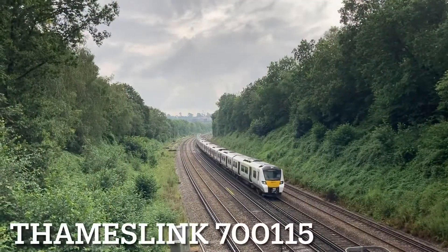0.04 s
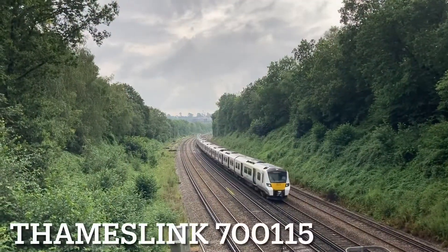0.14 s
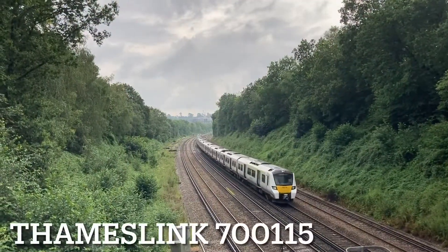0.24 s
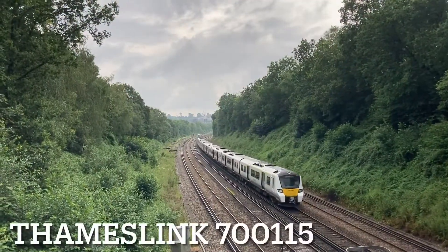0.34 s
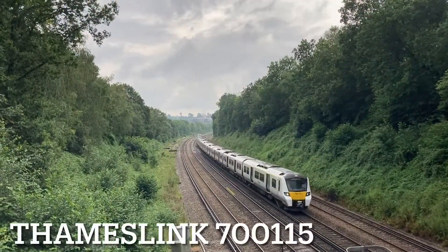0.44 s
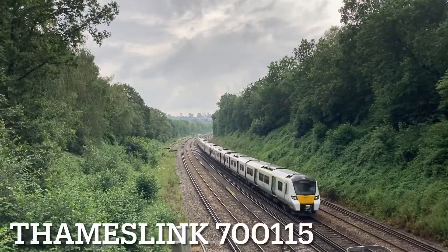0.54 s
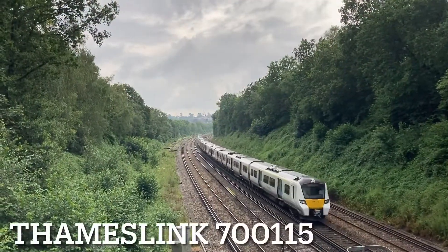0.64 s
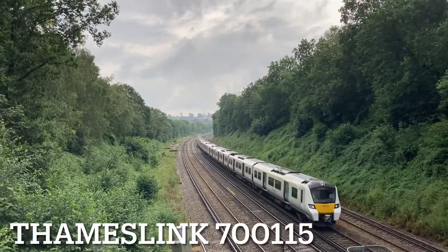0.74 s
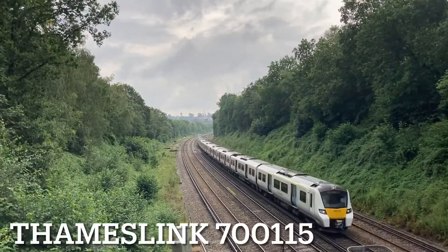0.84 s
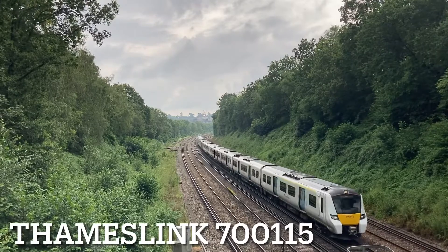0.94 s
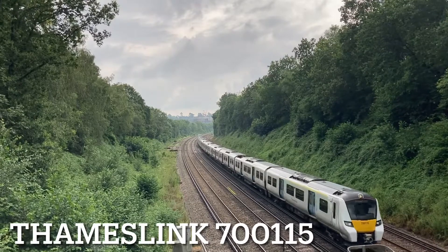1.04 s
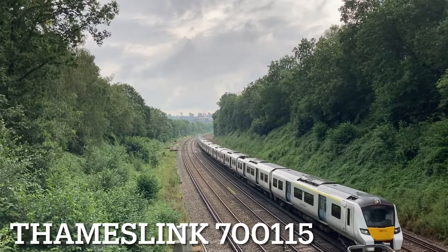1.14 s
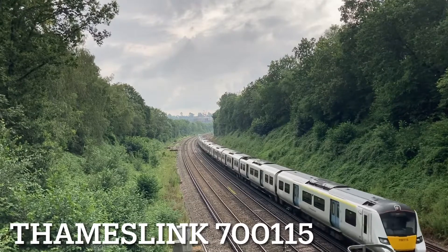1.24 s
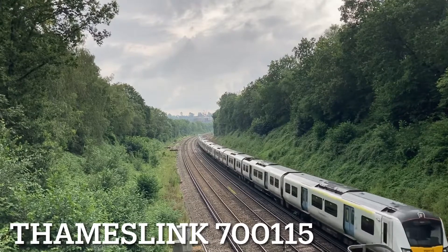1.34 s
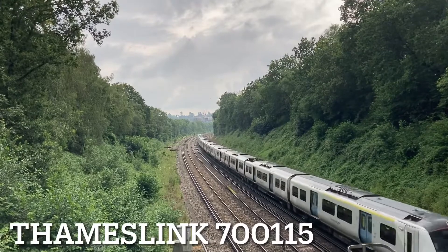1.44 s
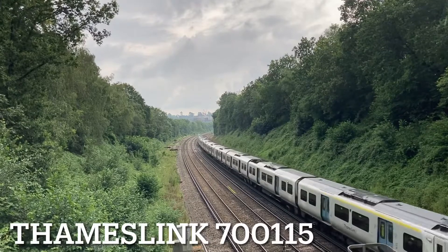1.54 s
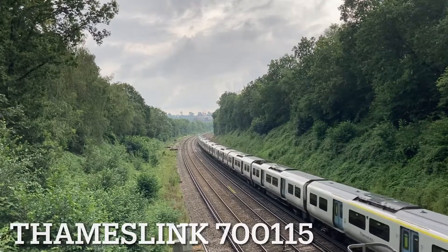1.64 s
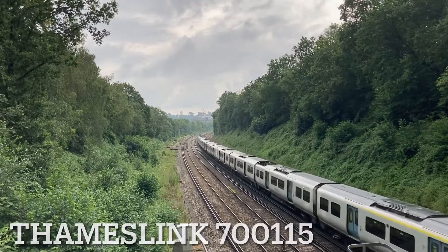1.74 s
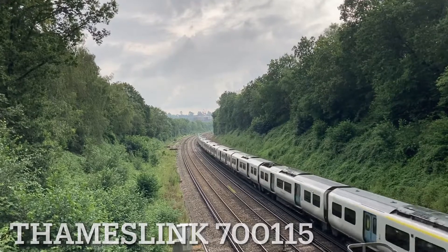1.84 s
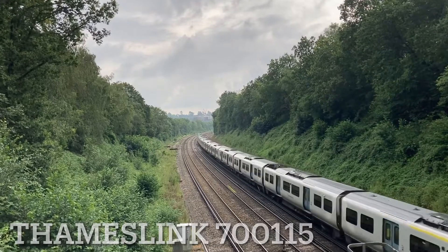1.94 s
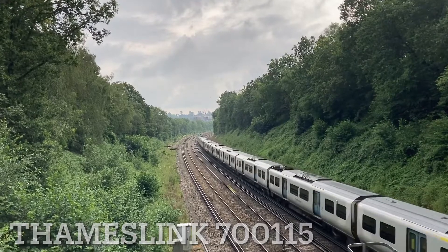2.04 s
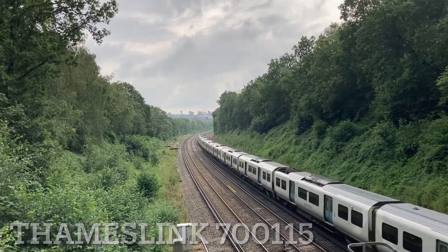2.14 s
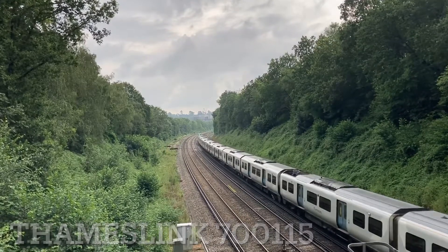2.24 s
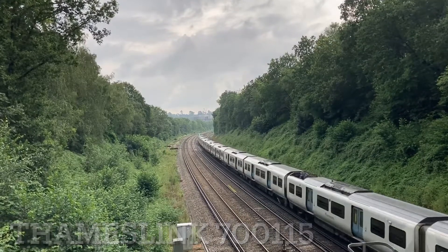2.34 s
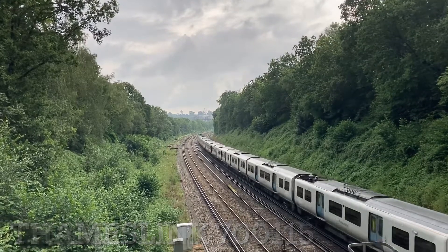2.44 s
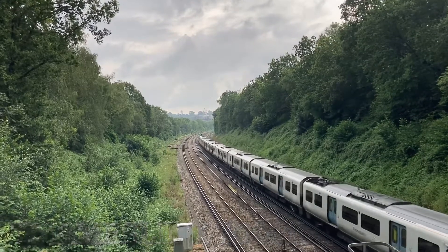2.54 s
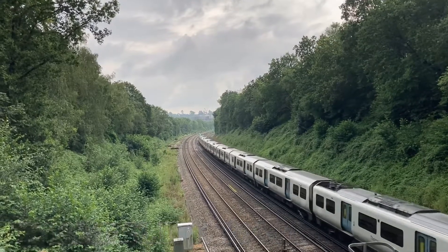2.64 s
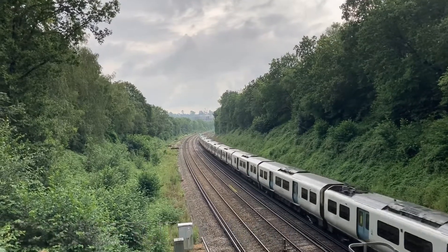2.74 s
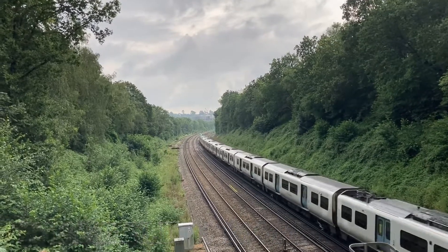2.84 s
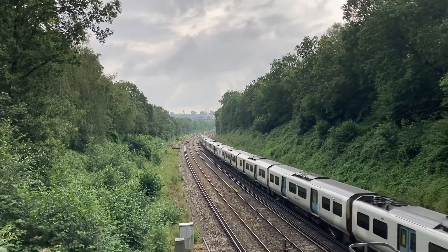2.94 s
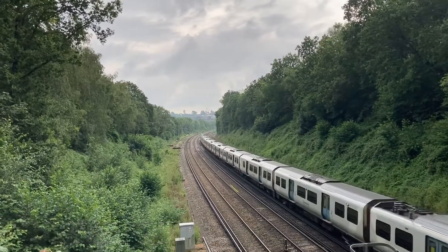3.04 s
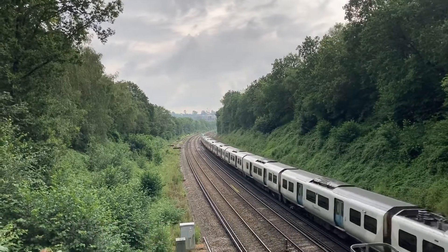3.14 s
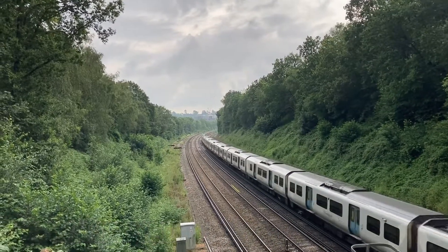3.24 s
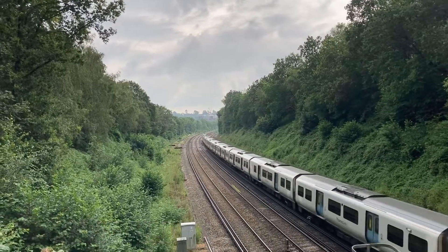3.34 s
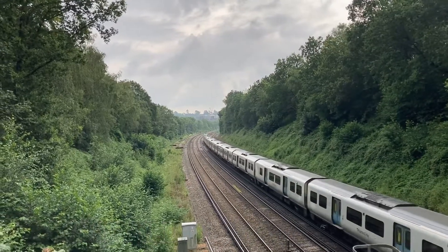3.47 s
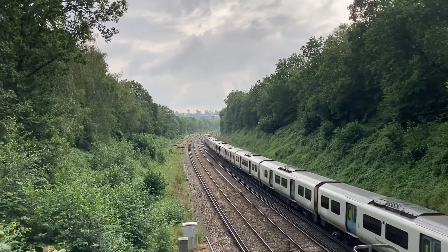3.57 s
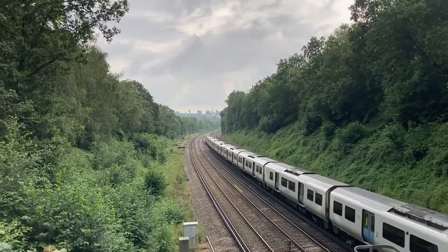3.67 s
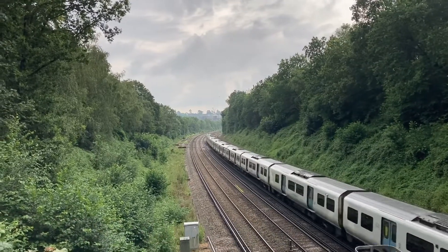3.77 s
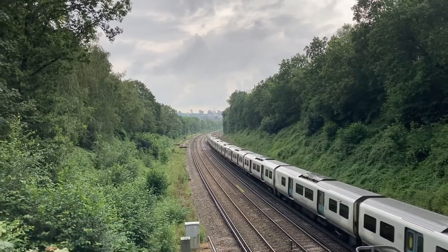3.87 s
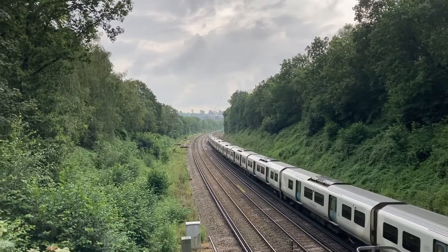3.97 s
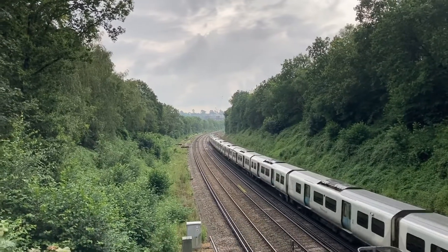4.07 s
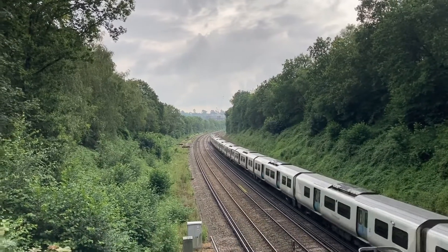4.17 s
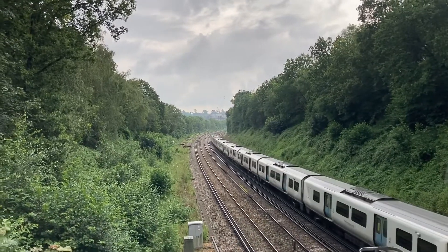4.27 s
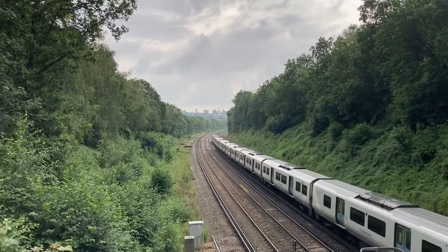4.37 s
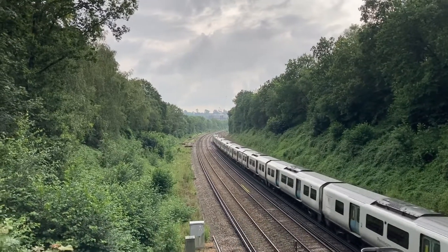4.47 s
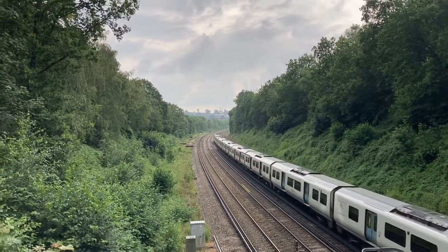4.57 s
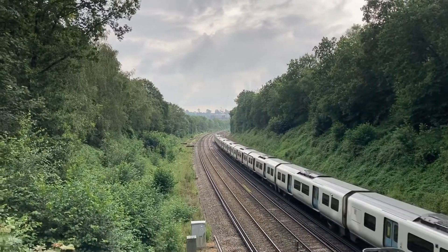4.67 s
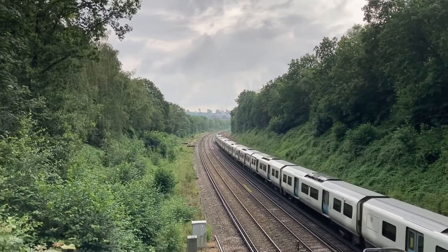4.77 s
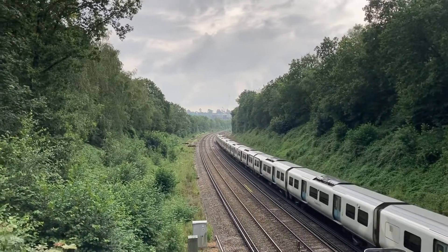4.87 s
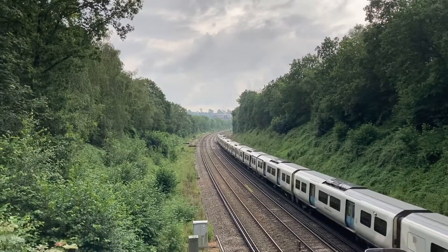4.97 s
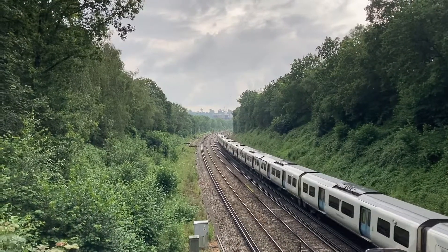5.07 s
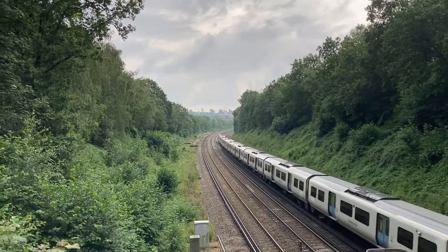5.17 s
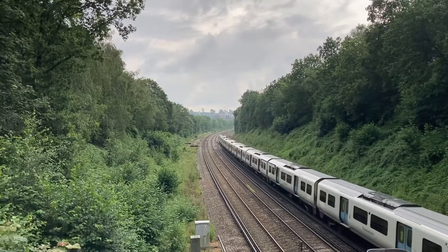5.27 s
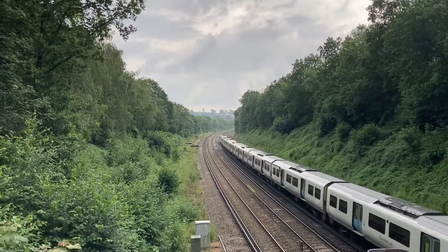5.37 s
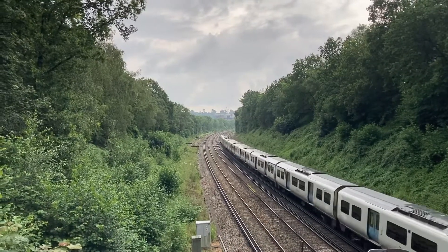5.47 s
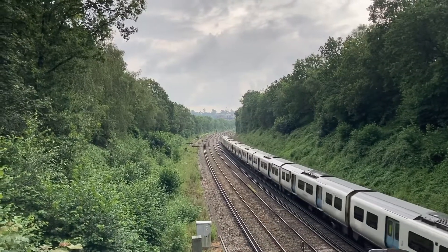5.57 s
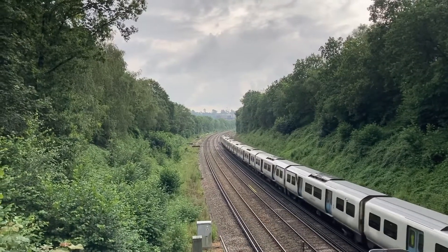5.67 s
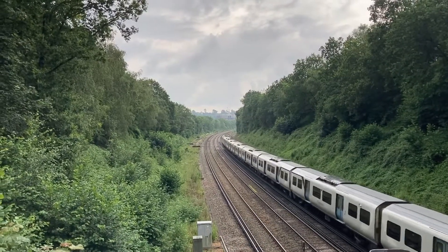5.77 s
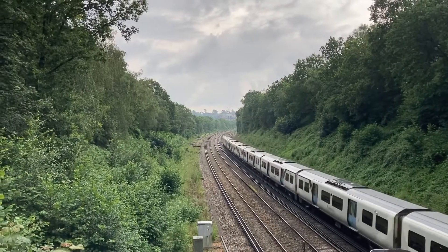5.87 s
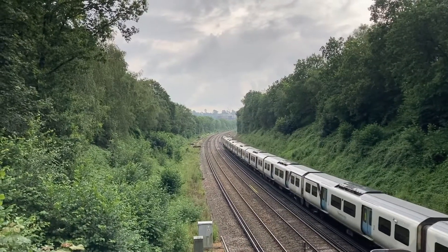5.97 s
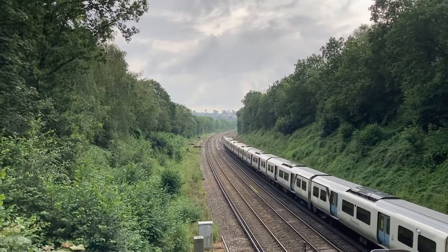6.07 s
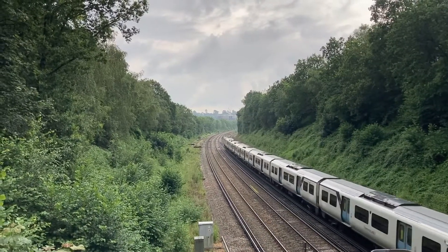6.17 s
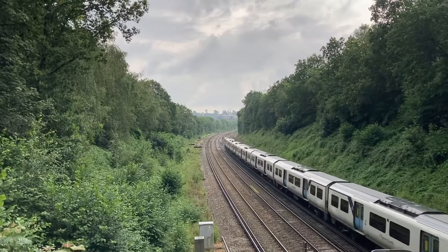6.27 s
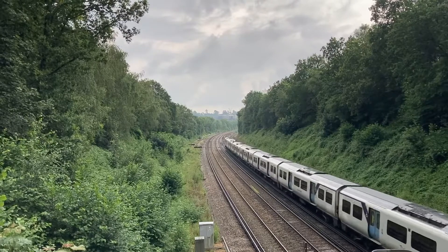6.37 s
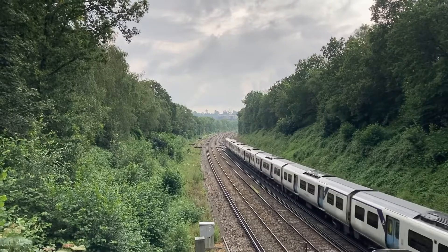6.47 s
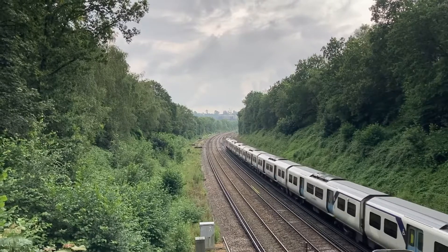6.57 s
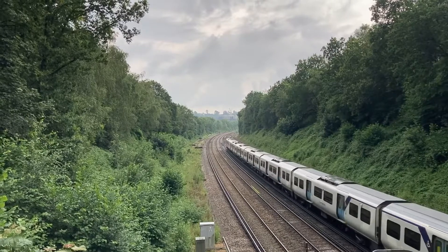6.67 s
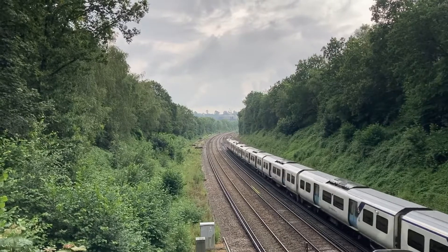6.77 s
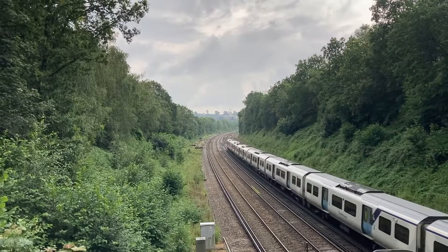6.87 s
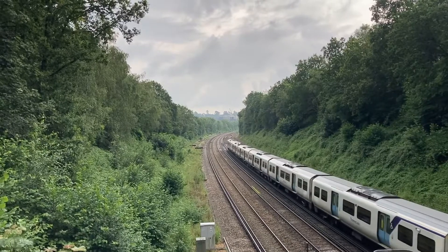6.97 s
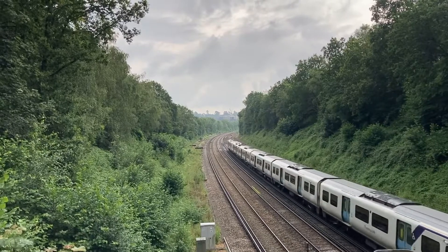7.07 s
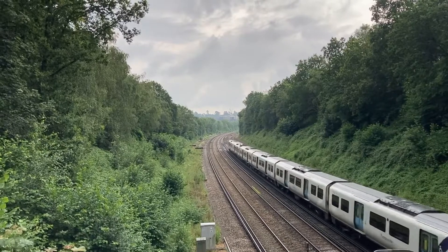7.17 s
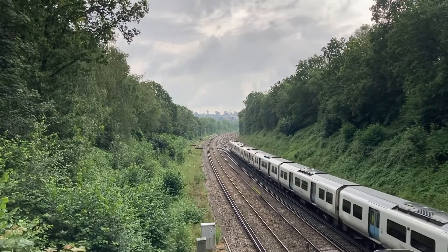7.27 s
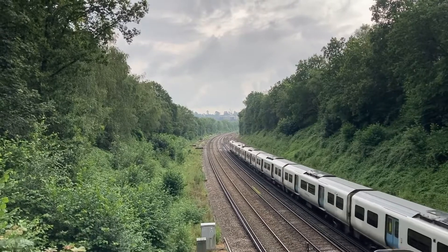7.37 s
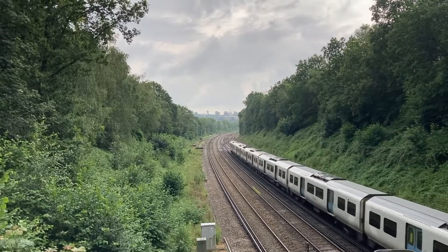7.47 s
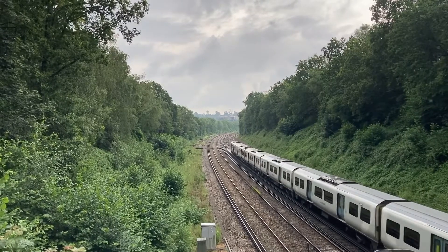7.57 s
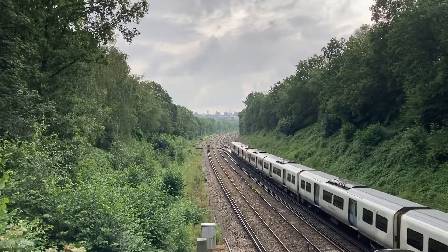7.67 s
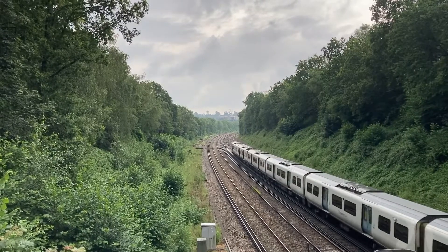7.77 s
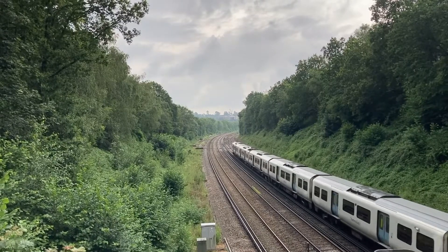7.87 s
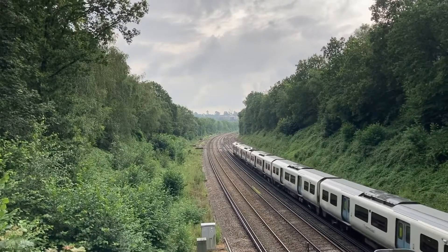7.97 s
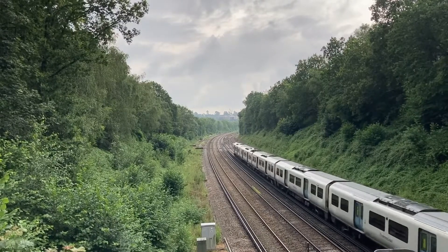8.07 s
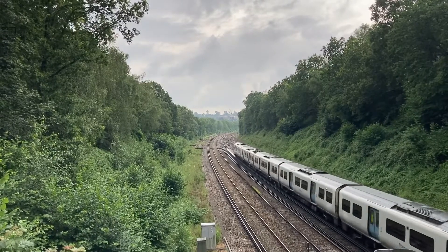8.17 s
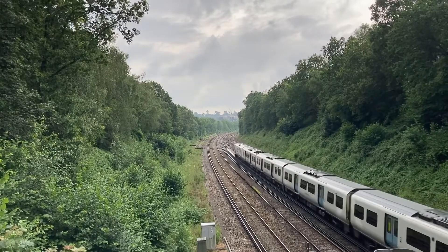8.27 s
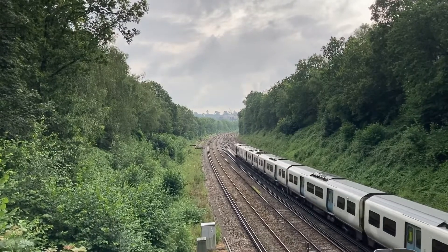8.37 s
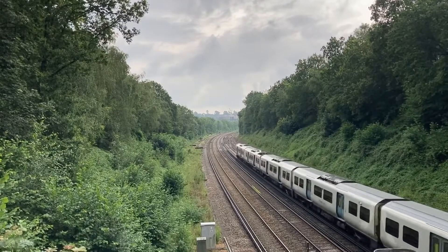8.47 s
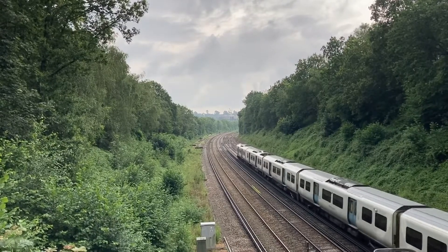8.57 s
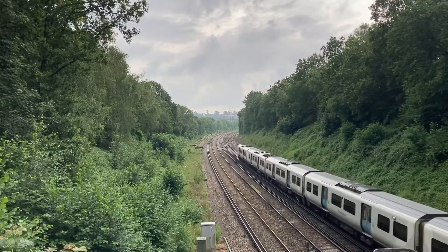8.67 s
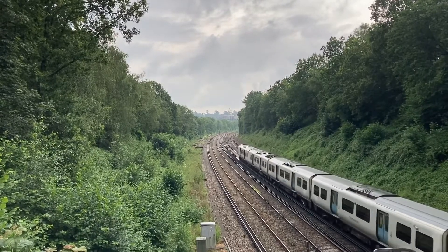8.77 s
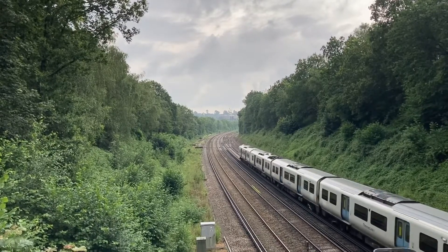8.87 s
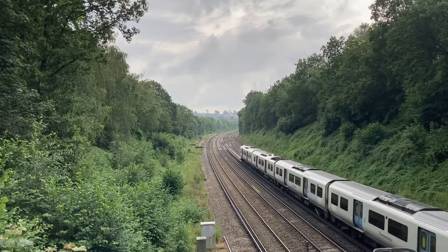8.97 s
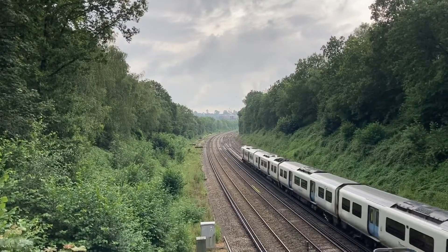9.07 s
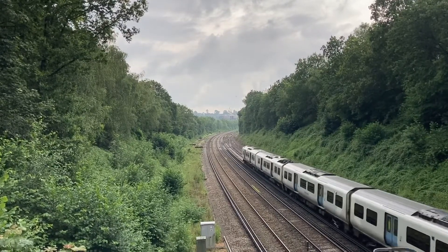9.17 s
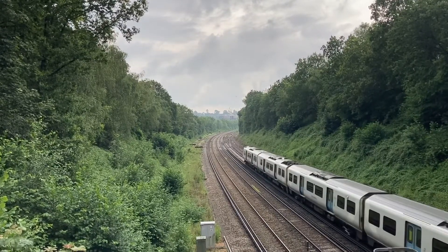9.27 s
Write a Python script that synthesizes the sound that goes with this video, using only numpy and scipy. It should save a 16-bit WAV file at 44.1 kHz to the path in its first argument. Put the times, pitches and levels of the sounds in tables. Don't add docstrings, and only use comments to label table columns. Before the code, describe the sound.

Close stereo outdoor pickup from a bridge above the track, train at lower right. A broad metallic roar with bright hiss grows, then stays strong and slightly uneven. Axles hit a rail joint in rhythmic double knocks, bogie after bogie, with dull sleeper thuds and soft earthy booms beneath. Gear hum comes and goes, a thin motor whine flickers briefly, and everything cuts off without fading.

```python
import sys
import numpy as np
from scipy import signal
from scipy.fft import rfft, irfft, next_fast_len
from scipy.io import wavfile
from scipy.ndimage import uniform_filter1d

SR = 44100
rng = np.random.default_rng(int(sys.argv[2]) if len(sys.argv) > 2 else 0)


def gain_from_db(level_db):
    decades = np.asarray(level_db, float) / 20
    return 10 ** decades


def bounce(signal):
    frames = np.transpose(np.atleast_2d(signal))
    limited = np.clip(frames, -1, 1)
    pcm = np.round(limited * 32767).astype(np.int16)
    wavfile.write(sys.argv[1], SR, pcm)


N = 411012

# (time [s], weight on ground [dB], wheel roughness [dB])
PASSING = [(0, -36.5, -37), (.3, -33, -44.5), (.62, -31, -33.5), (1.1, -32, -33), (1.4, -28, -35.5),
           (1.9, -27, -34), (2.35, -25.5, -32), (2.6, -28.5, -34), (3.15, -26.5, -32.5), (3.85, -29.5, -33),
           (4.35, -28.5, -35.5), (4.8, -29, -32.5), (5.4, -27.5, -37.5), (6.3, -27.5, -33.5),
           (7.6, -27, -34.5), (7.95, -26, -32), (8.6, -26, -33), (9.32, -26.5, -31.5)]
# (frequency [Hz], level [dB], t60 [s])
THUD = [(131.9, -1.5, 0.26), (168, 4.5, 0.14), (259.9, -9.5, 0.25)]


def evened(x):
    return x / np.sqrt(np.mean(x ** 2) + 1e-20)


def smooth_noise(shape, size):
    return evened(uniform_filter1d(rng.standard_normal(shape), size=size, axis=0))


def read(points, hz):
    f, value = np.transpose(points)
    return np.interp(np.log(hz + 1), np.log(f + 1), value)


def curve(rows, column):
    rows = np.array(rows)
    return np.interp(np.arange(N) / SR, rows[:, 0], rows[:, column])


def swells(rows, sizes):
    t = np.arange(0, N + 256, 256) / SR
    s, half_s = np.array(rows)[:, 0], np.array(rows)[:, 2]
    bells = np.exp(-((t[:, None] - s) / half_s) ** 2)
    return np.interp(np.arange(N) / SR, t, bells @ sizes)


def add(mix, s, sound):
    mix[..., round(s * SR):][..., :sound.shape[-1]] += sound


def port_pair(hz, sway=0):
    # (frequency [Hz], left lead [rad])
    lead = [(0, 0), (300, -.1), (1000, -.45), (1500, 0), (1900, 1.9), (2300, 3.4), (2600, 4.9), (3200, 4.9),
            (3900, 3.5), (4200, 2.3), (4600, 2.95), (5000, 3.14), (5600, 3.22), (6200, 3.65), (7400, 5.2),
            (7700, 5.9), (9500, 6.7), (9800, 7.4), (11800, 9.4), (16000, 13.7)]
    # (frequency [Hz], left minus right [dB])
    tilt = [(60, 0.8), (110, 0.9), (200, 1), (380, 0.8), (700, 5), (1290, 0.5), (2380, -2), (4400, 1),
            (8120, 0), (15000, 0)]
    f, lead_rad = np.transpose(lead)
    phase = np.interp(hz, f, lead_rad) + sway * (hz < 6500)
    half = gain_from_db(read(tilt, hz) / 2) * np.exp(.5j * phase)
    return np.array([half, 1 / half])


def rolling():
    sway = smooth_noise((N // 512 + 5, 1), 5)
    return rails(sway) + discs(sway) + ground(sway) + hiss(sway) + gearbox(sway)


def rails(sway):
    # (frequency [Hz], level [dB per Hz])
    colour = [(300, -50), (400, -7.5), (480, 1.5), (700, -1), (800, -3), (1050, -5.5), (1270, -4.5),
              (1470, -13), (1800, -11.5)]
    # (frequency [Hz], width [Hz], level [dB])
    rings = [(570, 35, 2), (918, 174, 5), (1187, 150, 7)]
    layer = roar(colour, rings, sway, patchy_db=1.0, singing_db=2.0, gusty_db=0.98)
    return layer * roughness_gain(0)


def discs(sway):
    # (frequency [Hz], level [dB per Hz])
    colour = [(1200, -51), (1450, -3.5), (2000, 2), (2700, -2), (3400, -3.5), (4000, -6.5), (4400, -11),
              (5200, -11.5), (6000, -14)]
    # (frequency [Hz], width [Hz], level [dB])
    rings = [(2150, 150, 4), (3040, 240, 5), (3830, 80, 5), (4800, 350, 5)]
    layer = roar(colour, rings, sway, patchy_db=1.2, singing_db=2.3, gusty_db=.2)
    return layer * roughness_gain(1)


def ground(sway):
    # (frequency [Hz], level [dB per Hz])
    colour = [(20, -75), (30, -39), (40, -19.5), (55, -11), (90, -9), (112, -8.5), (200, -7), (300, -11),
              (355, -17), (420, -13), (550, -28)]
    # (frequency [Hz], width [Hz], level [dB])
    rings = [(70, 24, 6.5), (150, 70, 2), (262, 30, 2.5)]
    layer = roar(colour, rings, sway, patchy_db=0.65, singing_db=0.9, gusty_db=0.4)
    return layer * gain_from_db(curve(PASSING, column=1) + 1.07)


def hiss(sway):
    # (frequency [Hz], level [dB per Hz])
    colour = [(4300, -30), (5200, .5), (6200, -1.5), (7500, -6), (8500, -6), (9200, -11), (13500, -16),
              (14400, -17), (14600, -16.5), (15200, -17), (15380, -28), (15650, -36), (16000, -60)]
    rings = [(5060, 330, -14), (5870, 1200, 3.0), (8140, 240, 0.7)]  # Hz, width Hz, dB
    layer = roar(colour, rings, sway, patchy_db=0.9, singing_db=2.0, gusty_db=0.03)
    return layer * roughness_gain(2)


def gearbox(sway):
    # (frequency [Hz], level [dB per Hz])
    colour = [(200, -51), (240, -23), (262, 3.5), (290, -8.5), (330, -26)]
    # (time [s], hum [dB], half length [s])
    motors = [(1.207, -23, 0.16), (1.905, -27, .07), (2.332, -21, 0.14), (2.802, -30, 0.25),
              (3.2, -22.5, 0.53), (4.184, -26, 0.086), (4.8, -28.5, 0.98), (5.7, -45, 0.29),
              (7.0, -26.5, 0.73), (7.394, -20.5, 0.11), (7.802, -23, 0.24), (8.4, -25.5, 0.093)]
    hum = roar(colour, [], sway, patchy_db=0.3, singing_db=-1.8, gusty_db=-1.0)
    idle_hum_db = -39
    return hum * gain_from_db(-11.5) * (gain_from_db(idle_hum_db) + swells(motors, gain_from_db(np.array(motors)[:, 1])))


def roughness_gain(layer):
    # (offset [dB], share of roughness [0-1], share of rattle [0-1])
    follow = [
        (-27.5, 0.75, 1),
        (-32.5, 0.34, 0.42),
        (-46, 0.4, 0.32),
    ]
    # (time [s], swell [dB], half length [s])
    rattles = [(0.29, 8.5, 0.078), (0.751, 7.5, 0.031), (1.213, 5, 0.043), (1.321, 5.5, 0.018),
               (1.433, 6.5, 0.04), (1.563, 3.5, 0.037), (1.752, 7, 0.015), (1.879, 6, 0.029),
               (2.176, 1.5, 0.028), (3.348, 2, 0.053), (3.76, 5, 0.039), (4.1, 3.5, 0.059),
               (4.53, 3.5, 0.044), (4.958, 1, 0.034), (5.303, 3.5, 0.045), (5.59, 1.5, 0.058),
               (6.414, 2.5, 0.028), (6.504, 2, 0.013), (7.687, 5.5, 0.0098), (8.19, 4.5, 0.097),
               (8.343, 5, .025), (8.455, 2.5, 0.014), (8.613, 4, 0.045), (9.112, 2, 0.087),
               (9.244, 6, 0.024)]
    usual_rough_db = -32
    rough_db = curve(PASSING, column=2) - usual_rough_db
    rattle_db = swells(rattles, np.array(rattles)[:, 1])
    offset_db, rough, rattle = follow[layer]
    return gain_from_db(offset_db + rough * rough_db + rattle * rattle_db)


def roar(colour, rings, sway, patchy_db, singing_db, gusty_db):
    # (time [s], swell [dB], half length [s], frequency [Hz])
    mode_swells = [(0.19, 5, 0.21, 4050), (0.26, 7, 0.06, 3260), (0.268, 5, 0.06, 810), (0.62, 7, 0.06, 3320),
                   (0.75, 4, 0.06, 1360), (0.76, 9, 0.11, 1610), (0.76, 12, 0.13, 4060),
                   (0.752, 4.5, 0.22, 854), (0.806, 8, 0.2, 3260), (0.85, 11, 0.11, 2220),
                   (1.186, 6, 0.06, 970), (1.24, 5, 0.043, 1520), (1.25, 5.8, 0.07, 3320), (1.3, 5, 0.074, 850),
                   (1.4, 11, 0.12, 4020), (1.458, 6, 0.048, 1460), (1.48, 7, 0.11, 3210),
                   (1.898, 1, 0.05, 3010), (2.04, 6, 0.13, 4100), (2.08, 8, 0.14, 2430), (2.09, 6, 0.036, 1900),
                   (2.12, 3, 0.1, 3830), (2.132, 4.9, 0.039, 2930), (2.17, 9, 0.067, 2180),
                   (2.68, 7, 0.17, 2370), (2.69, 10, 0.06, 4280), (3.4, 2, 0.075, 1140),
                   (3.58, 10, 0.066, 2560), (3.79, 6, 0.06, 4050), (4.53, 5, 0.07, 1320),
                   (4.58, 2, 0.083, 1790), (4.58, 5.5, 0.07, 3790), (4.96, 5, 0.079, 1250),
                   (4.98, 8, 0.045, 2960), (5.296, 5, 0.05, 1206), (5.612, 7, 0.17, 2670),
                   (6.432, 14, 0.055, 3490), (6.8, -3, 0.13, 4390), (8.175, 8, 0.046, 1530),
                   (8.577, 11, 0.047, 940), (8.61, 6, 0.09, 3120), (9.165, 6, 0.067, 980),
                   (9.25, 4.7, 0.07, 4070),
                   (5.65, -6, 0.24, 1210),
        (6.2, -3.5, 0.62, 1260),
        (6.898, -5, 0.26, 1230),
        (9.0, -3, .15, 780),
                   (0.73, 8, 0.064, 340), (0.89, 5, .1, 360), (0.96, 4, 0.087, 160), (1.2, 9.5, 0.036, 350),
               (1.25, 10, 0.023, 180), (1.42, -3, 0.085, 380), (1.497, 4.5, .04, 150),
               (2.08, 5, 0.066, 1000), (2.28, -1, .08, 570), (3.2, -1, 0.084, 97), (3.48, 1, 0.11, 134),
               (4.4, -1, 0.12, 200), (4.51, 7, .03, 1160), (4.94, 4, 0.073, 400), (5.6, 5.5, .06, 440),
               (6.15, 1.5, 0.13, 203), (6, 0.5, 0.093, 520), (7.3, -5, 0.15, 360), (7.6, -8, .05, 280),
               (7.95, 6.5, .06, 110), (8.03, 7, .03, 1170), (8.2, -1, .06, 780), (8, 5, 0.048, 140),
               (7.51, -12, .03, 120), (8.02, -5, 0.033, 100), (5.3, -5, 0.043, 90), (0.47, -2.5, 0.32, 350),
               (.45, -6, 0.18, 1080), (0.97, -3, .12, 1080), (1.19, 6, 0.059, 60), (4.4, 5, 0.11, 130),
               (4.15, 6, 0.086, 70), (9, -6, .08, 180), (8.8, -3.5, 0.084, 250), (3.33, -0.5, .1, 280),
               (1.7, 0, 0.043, 190), (.75, -2.5, 0.19, 43), (2.2, 2, .03, 70), (6.4, 4.5, 0.074, 70),
               (6.8, 9, 0.089, 100), (4.3, -8, 0.18, 4400), (1.56, -3, .05, 560), (1.43, -3, .04, 510),
               (2.4, -1, .06, 620), (.7, 5, 0.76, 4400), (1.2, 3.5, 1, 1460)]
    # (time [s], distance [0 near, 1 far, may go beyond])
    distance = [(0, 1.5), (.7, 1.87), (1.2, 1), (1.8, 0.16), (2.4, -0.04), (5, -0.15), (7, 0.5),
                (9.32, 0.34)]
    # (frequency [Hz], level [dB])
    far_colour = [(70, -0.5), (120, -2), (300, -2.5), (1000, -1), (2000, -4.5), (3100, -2.5), (5000, -2),
                  (8000, -2.5), (14000, -4)]
    # (frequency [Hz], likeness [0-1])
    likeness = [(30, .88), (70, .94), (130, .99), (250, .98), (400, .93), (700, .8), (1300, .75),
                (1700, .55), (2300, .45), (3100, .68), (4000, .3), (4700, .8), (4900, .88), (5150, .96),
                (5600, .965), (6100, .91), (7000, .85), (7700, .98), (9500, .98), (10200, .75),
                (12000, .95), (15000, .97)]
    wander, wander_db, singing_width_hz = .012, .8, 76

    frames, hz = N // 512 + 5, np.fft.rfftfreq(2048, 1 / SR)
    frame_s = np.arange(frames) * 512 / SR
    used = (hz > colour[0][0] / 2) & (hz < colour[-1][0])
    hz = hz[used]
    a, b, c, d, patches, streaks = rng.standard_normal((6, frames, 1025), np.float32)[:, :, used]
    patches = uniform_filter1d(patches, size=8, axis=1)
    patches = evened(uniform_filter1d(patches, size=8, axis=0))
    streaks = uniform_filter1d(streaks, size=2, axis=1)
    streaks = evened(uniform_filter1d(streaks, size=20, axis=0))
    gusts = smooth_noise((frames, 1), 5)
    far = np.interp(frame_s, *np.transpose(distance))[:, None]

    drift = evened(uniform_filter1d(a[:, :16], size=24, axis=0)).T[:, :, None]
    shape_db = read(colour, hz)
    for k, (f, width_hz, db) in enumerate(rings):
        centre_hz = f * (1 + wander * drift[k + 8])
        shape_db = shape_db + (db + wander_db * drift[k]) / (1 + (2 * (hz - centre_hz) / width_hz) ** 2)
    shape_db = shape_db + far * read(far_colour, hz)
    shape_db = shape_db + patchy_db * patches + singing_db * streaks + gusty_db * gusts

    s, swell_db, half_s, mode_hz = np.transpose(mode_swells)
    when = np.exp(-((frame_s[:, None] - s) / half_s) ** 2)
    where = np.exp(-((hz - mode_hz[:, None]) / singing_width_hz) ** 2)
    shape_db = shape_db + when * swell_db @ where

    same = np.clip(read(likeness, hz), 0, 1)
    left = a + 1j * b
    right = same * left + np.sqrt(1 - same ** 2) * (c + 1j * d)
    z = np.zeros((2, frames, 1025), np.complex64)
    z[:, :, used] = [left, right] * port_pair(hz, .22 * sway * hz / 5500) * gain_from_db(shape_db)
    wave = signal.istft(z, nperseg=2048, noverlap=1536, time_axis=1, freq_axis=2)[1]
    return evened(wave[:, :N])


def ring(modes, rise_s, pitch=1):
    t = np.arange(SR // 3) / SR
    detune = pitch * (1 + 0.027 * rng.standard_normal(len(modes)))
    wave = np.zeros(len(t))
    for i, (hz, db, t60_s) in enumerate(modes):
        wave += (-1) ** i * gain_from_db(db - 60 * t / t60_s) * np.sin(2 * np.pi * hz * detune[i] * t)
    wave *= 1 - np.exp(-t / rise_s)
    return wave / abs(wave).max()


def axles():
    # (time [s], front thud [dB], rear thud [dB], front clank [dB], rear clank [dB])
    bogies = [(.709, -33, -42, -38, -47), (1.205, -12.5, -27, -18.5, -32), (1.877, -12.5, -18, -16, -21),
              (2.157, -15.5, -27, -18.5, -19), (2.829, -16.5, -15, -19.5, -27),
              (3.103, -16, -33, -20.5, -18), (3.766, -14.5, -16, -21, -27), (4.037, -15.5, -25, -20, -30),
              (4.691, -13, -22, -23, -37), (4.972, -20, -16, -16.5, -19.5), (5.619, -10.5, -14, -20.5, -19),
              (5.894, -13, -36, -21, -18), (6.537, -13.5, -14.5, -24, -17), (6.806, -14.5, -21, -17.5, -16),
              (7.446, -13, -14.5, -19.5, -18), (7.713, -15, -33, -15, -15), (8.349, -12.5, -15, -17.5, -16),
              (8.609, -14.5, -24, -18, -25), (9.249, -13.5, -24, -20, -14)]
    wheelbase_m, start_m_per_s, gain_m_per_s2 = 2.2, 20.9, .37
    rows = []
    for s, thud_db, rear_thud_db, clank_db, rear_clank_db in bogies:
        rear_s = s + wheelbase_m / (start_m_per_s + gain_m_per_s2 * s)
        rows += [(s, thud_db, clank_db), (rear_s, rear_thud_db, rear_clank_db)]
    return [row for row in rows if row[0] < N / SR]


def joint():
    # (frequency [Hz], level [dB], t60 [s])
    clank_modes = [(460, -9.5, 0.15), (569, 10.5, 0.043), (610, 0.5, 0.075), (963, -2, 0.073)]
    landing_db = [-3, -15]
    rebound_s, rebound_db = .033, -10
    out = np.zeros(N + SR)
    for k, (s, thud_db, clank_db) in enumerate(axles()):
        clank = gain_from_db(clank_db + 0.4) * ring(clank_modes, rise_s=0.0013)
        add(out, s - .002, clank)
        add(out, s + 0.01062, gain_from_db(landing_db[k % 2]) * clank)
        add(out, s + 0.00512, gain_from_db(thud_db) * ring(THUD, rise_s=0.002))
        add(out, s + rebound_s, gain_from_db(thud_db + rebound_db) * ring(THUD, rise_s=0.005))
    return out[:N]


def loose_sleeper():
    # (time [s], thud [dB])
    loose = [(2.668, -28), (3.407, -23), (3.5, -23), (2.99, -21), (4.256, -24), (4.99, -15.5), (5.268, -20),
             (6.084, -20), (6.195, -13.5), (6.47, -18), (7.001, -19.5), (7.099, -15.5), (8.001, -28),
             (8.905, -15.5)]
    out = np.zeros(N + SR)
    for s, thud_db in loose:
        add(out, s, gain_from_db(thud_db) * ring(THUD, rise_s=0.007, pitch=0.92))
    return out[:N]


def embankment():
    # (frequency [Hz], level [dB], t60 [s])
    boom_modes = [(70.4, -1.5, 0.69), (86.6, -1, 0.33)]
    # (time [s], level [dB])
    booms = [(1.327, -25), (1.605, -22), (1.726, -22), (1.857, -23), (2.269, -22), (2.384, -17),
             (2.676, -20), (2.843, -31), (3.142, -18.5), (3.214, -22), (3.327, -20), (3.503, -25),
             (3.598, -24), (4.044, -23), (4.443, -23.5), (4.991, -21), (5.176, -24), (5.267, -24),
             (5.363, -28), (5.468, -19.5), (5.635, -28), (6, -22), (6.094, -21), (6.185, -25), (6.552, -22),
             (6.825, -19), (6.895, -25), (7.007, -20.5), (7.097, -27), (7.461, -20), (7.649, -25),
             (7.733, -25), (7.805, -21), (8.007, -22), (8.288, -22), (8.455, -24), (8.719, -18),
             (8.895, -21), (9.088, -22), (9.186, -22)]
    out = np.zeros(N + SR)
    for s, boom_db in booms:
        add(out, s - .01, gain_from_db(boom_db - 1.0) * ring(boom_modes, rise_s=0.01))
    return out[:N]


def burst(length_s, hz, db, lead_rad=0.):
    t = np.arange(round(length_s * SR)) / SR
    wave = np.sin(2 * np.pi * hz * t + np.array([[lead_rad], [0]]))
    return gain_from_db(db) * np.sqrt(2) * np.sqrt(np.sin(np.pi * t / length_s)) * wave


def whine():
    # (start [s], end [s], multiple [1], level [dB], left lead [rad])
    whines = [ (3.81, 3.92, 3, -40, -1.1), (3.77, 3.91, 5, -37, .1), (4.175, 4.25, 5, -39, -.5),
              (3.775, 3.83, 9, -47.5, -.6), (3.865, 3.915, 9, -47, -.6), (3.755, 3.865, 10, -48, 2.1),
              (3.85, 3.935, 10, -47.5, 2.1), (3.925, 3.97, 10, -49, 2.1), (3.77, 3.9, 11, -48, 2.),
              (3.9, 3.96, 11, -55, 2.), (3.685, 3.725, 11.85, -49, -1.), (3.74, 3.79, 12, -53, -1.),
              (3.8, 3.885, 12, -52, -1.), (3.87, 3.96, 11.85, -52, -1.), (6.67, 6.75, 11.92, -49, -1.5),
              (8.3, 9.3, 17, -63, 0.), (3.93, 4.02, 9, -53, -.6), (8.1, 8.3, 7.45, -47, .3)]
    switching_hz = 512.3
    out = np.zeros((2, N + SR))
    for start_s, end_s, multiple, db, lead_rad in whines:
        tone = burst(end_s - start_s, multiple * switching_hz, db, lead_rad)
        flutter = uniform_filter1d(rng.standard_normal(tone.shape[1]), size=450)
        flutter_db = 2.2 * evened(flutter - flutter.mean())
        add(out, start_s, tone * gain_from_db(flutter_db))
    return out[:, :N]


def ticks():
    # (time [s], frequency [Hz], level [dB], length [s])
    events = [ (.724, 13500, -64, .003), (.768, 13500, -63, .003), (1.5285, 11800, -49.5, .001),
              (1.5283, 8000, -40, .0007), (1.531, 8000, -50, .0008), (3.486, 13500, -60, .003),
              (6.552, 13800, -63, .006), (6.827, 13500, -64, .003), (3.275, 2120, -31, .003),
              (4.32, 2280, -32, .002), (4.42, 2150, -32, .002), (5.555, 2910, -31, .003),
              (4.517, 1900, -31, .002), (7.655, 2890, -31, .002), (8.426, 3100, -31, .003),
              (8.617, 1600, -28, .003), (9.251, 1600, -28, .003), (6.9895, 2750, -27, .005),
              (8.07, 13720, -67, .08), (8.14, 13600, -66, .09)]
    out = np.zeros((2, N))
    for s, hz, db, length_s in events:
        add(out, s - length_s / 2, burst(length_s, hz, db))
    return out


def scene():
    size = next_fast_len(N)
    knocks = rfft(joint() + loose_sleeper() + embankment(), size)
    knocks = knocks * port_pair(np.fft.rfftfreq(size, 1 / SR))
    return rolling() + irfft(knocks, size)[:, :N] + whine() + ticks()


def band_limit(x):
    return signal.sosfilt(signal.butter(12, 15980, fs=SR, output="sos"), x)


def record(dry):
    mic_low_hz = 36
    high_pass = signal.butter(4, mic_low_hz, "high", fs=SR, output="sos")
    return band_limit(signal.sosfilt(high_pass, dry))


dry = scene()
out = record(dry)
bounce(out)
```